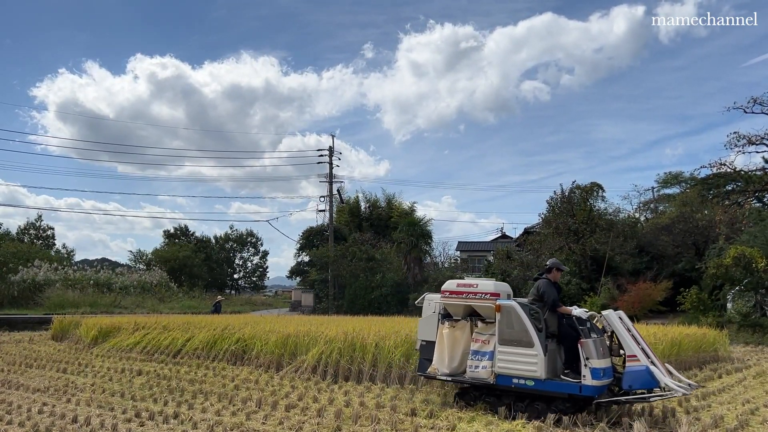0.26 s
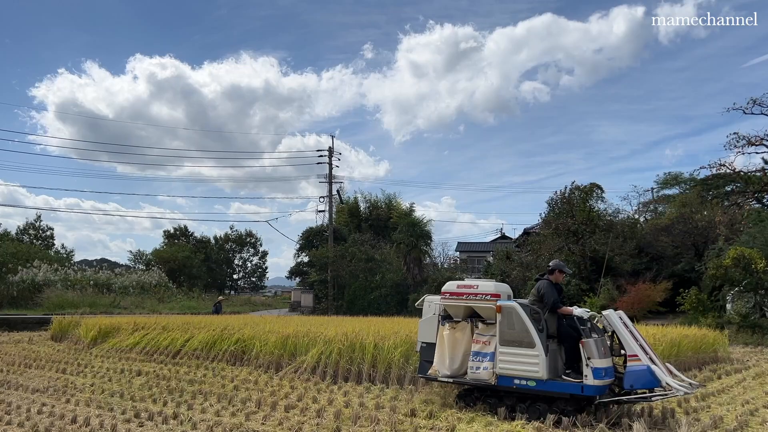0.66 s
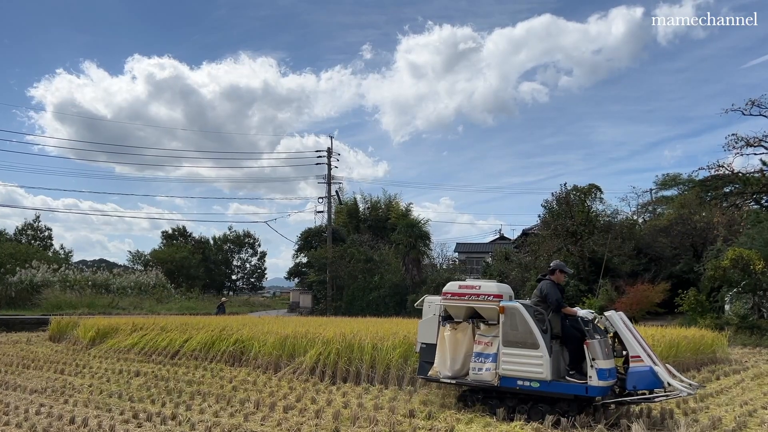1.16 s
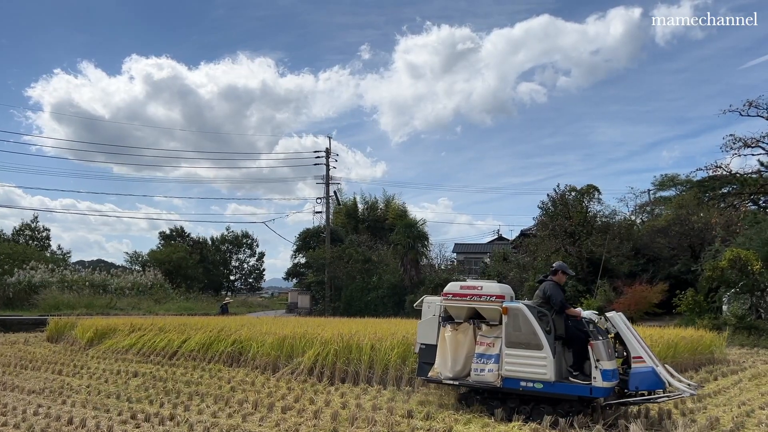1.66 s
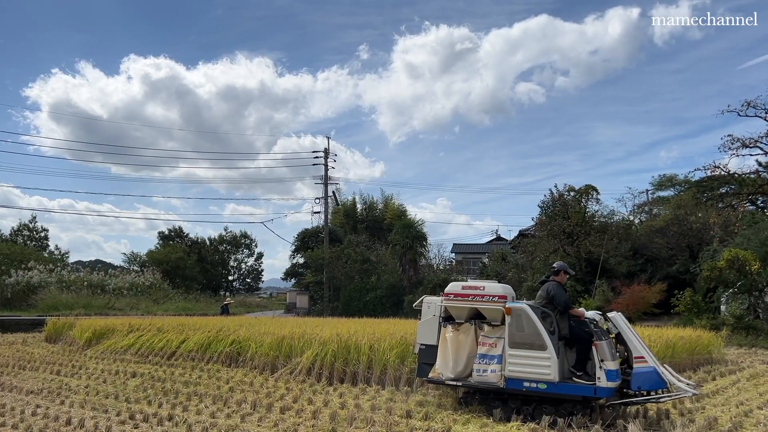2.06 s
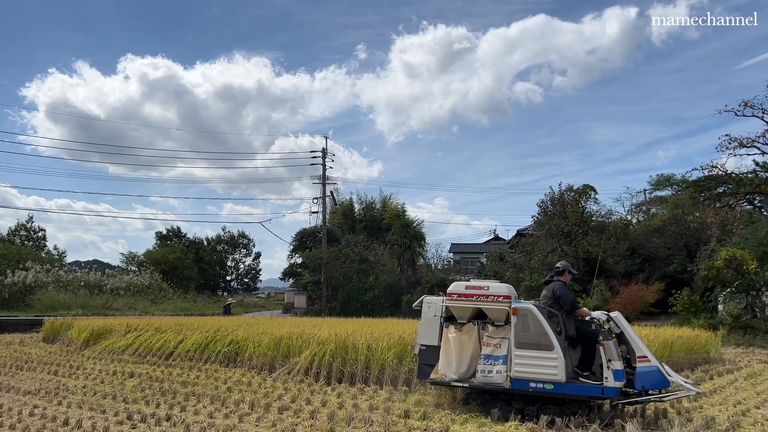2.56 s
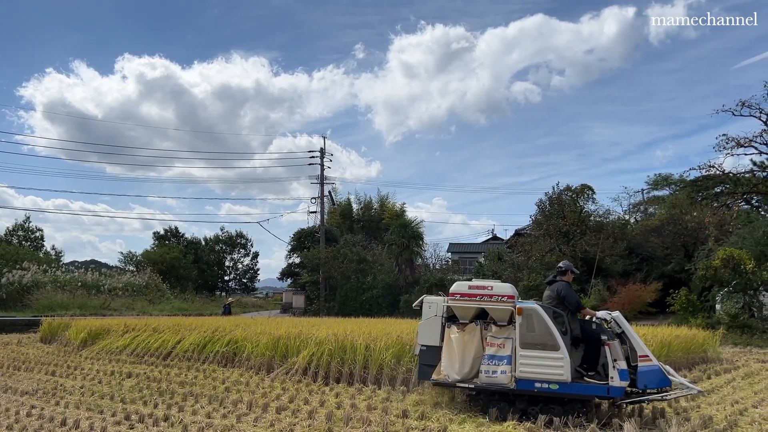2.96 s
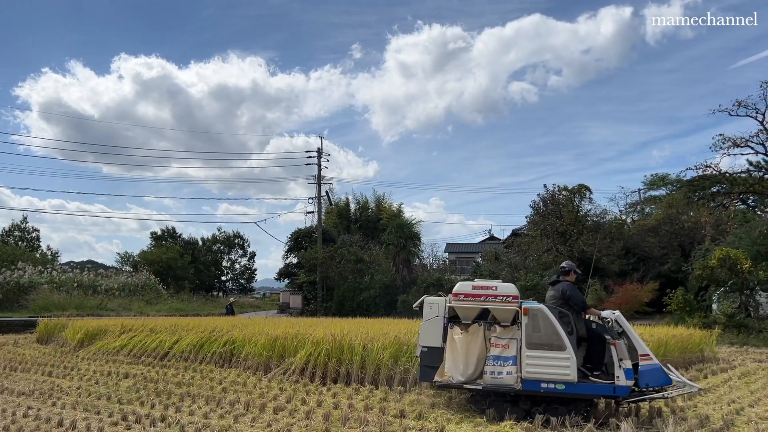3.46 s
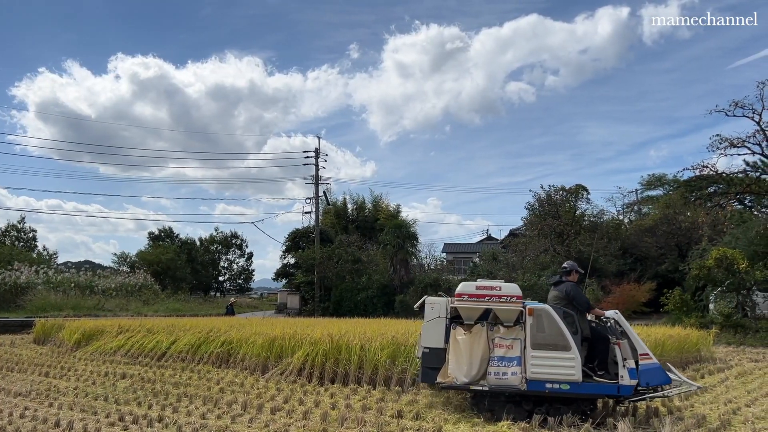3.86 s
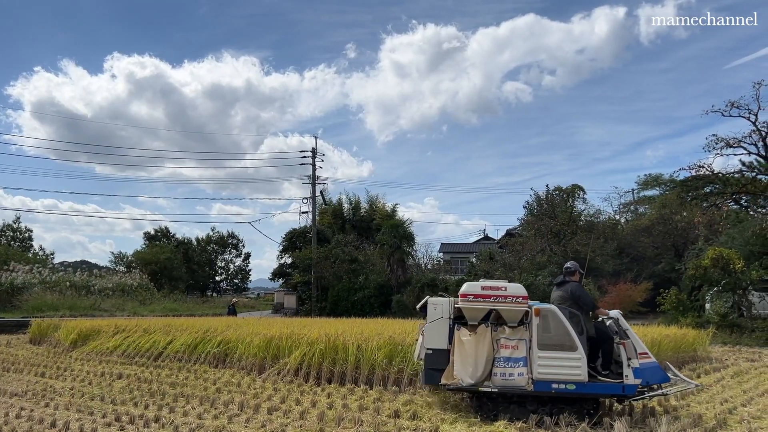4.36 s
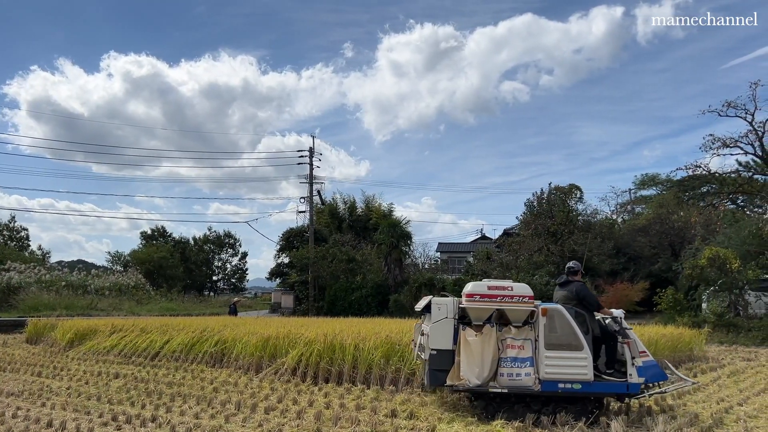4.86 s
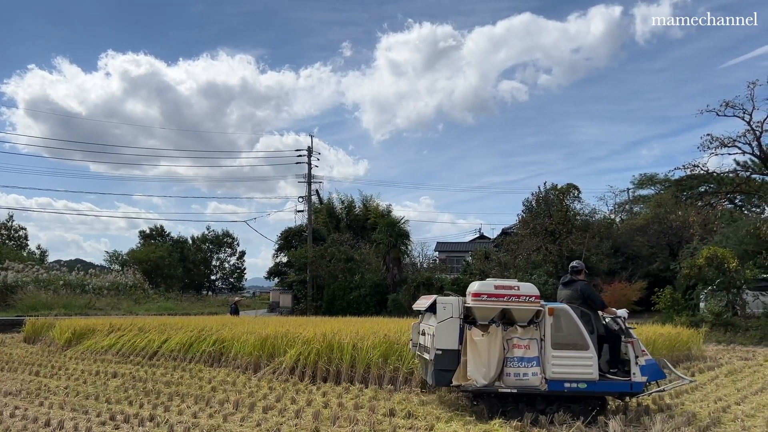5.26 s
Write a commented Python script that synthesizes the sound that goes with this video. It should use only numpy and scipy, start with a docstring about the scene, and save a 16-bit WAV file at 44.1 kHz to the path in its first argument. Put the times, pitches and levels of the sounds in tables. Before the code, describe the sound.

Deep wind thumps and gusts rumble over the steady roar, hum and thin whine of a little harvester cutting dry rice outdoors.

```python
"""A small rice combine drones in a breezy field, heard at two microphone ports, left and right.
Noise coloured by panel resonances makes the thresher's roar, and noise in fine grains the straw's rustle;
short bursts tick once an engine cycle, and wavering sines make the hum and whine of the machine.
Gusts buffet the ports as low noise; short swings add low swells of the throb and higher, wind-like thumps."""
import sys
import numpy as np
from scipy import signal
from scipy.fft import rfft, irfft, next_fast_len
from scipy.io import wavfile
from scipy.ndimage import uniform_filter1d, map_coordinates

SR = 44100
rng = np.random.default_rng(int(sys.argv[2]) if len(sys.argv) > 2 else 0)


def dump(signal):
    """Clip the signal to [-1, 1] and save it as 16-bit WAV at the path in sys.argv[1]."""
    limited = np.clip(np.atleast_2d(signal).T, -1, 1)
    pcm = np.round(limited * 32767).astype(np.int16)
    wavfile.write(sys.argv[1], SR, pcm)


N = 243431

# Panel resonances as heard at the ports:
# centre_hz, relative_gain_db, left_minus_right_db, likeness (correlation of the ports), left_lead_rad
PANEL_COLOUR = [(517, -1.2, -1, 0.67, 0.44), (810, 0, -6, 0.91, -0.11), (920, -2.5, -1, 1, 0.23),
                (1390, -6, 0, 0.64, -0.45), (1473, -2.5, -6, 0.98, -0.74), (1830, -2, -0.5, 0.91, 0.31),
                (2090, -5.5, -1.5, 0.64, 0.23), (2224, -4, -6, 0.94, 0.44), (2960, -10.5, 4, 0.58, 0.36),
                (3400, -15, -9, 0.44, -0.51), (3555, -12, 10.5, 0.7, -0.71), (3720, -20.5, 8.5, 0.58, 0.64),
                (4166, -11.5, -3, 0.97, -0.71), (4950, -21.5, -4.5, 0.36, 0.73)]


def thresher_roar():
    """Forced resonance: broadband noise drives the panels, which favour their own frequencies."""
    covers = rattle(count=1600, low_hz=1000.3, high_hz=3007, t60=0.11, spread_db=3.5)[[0, 0]]
    drive = unit(patchy(depth_db=0.85)) + .5 * unit(grainy(rate=400, spread_db=2.5))
    drive = drive + amp(-16.5) * covers  # loose covers ring under the roar
    return amp(-37) * unit(at_ports(through_modes(drive), PANEL_COLOUR))  # a steady level


def through_modes(pair):
    """Modal resonance: the sheet metal lifts narrow bands out of the roar."""
    # modes of the sheet metal: centre_hz, width_hz, boost_db
    modes = [(544, 12, 5.5), (591, 6.6, 5), (840, 36, 0.5), (900, 124, 3), (985, 17, 3.5), (1700, 44, 0),
             (1940, 90, 1.5), (2210, 44, 0.5), (2744, 21, 1.5)]
    m = next_fast_len(N + 8192)
    f = np.fft.rfftfreq(m, 1 / SR)
    boost_db = sum(db / (1 + (2 * (f - hz) / width) ** 2) for hz, width, db in modes)
    return irfft(rfft(pair, m) * amp(boost_db), m)[:, :N]


def rattle(count, low_hz, high_hz, t60, spread_db):
    """Free damped vibration: chains, fingers and covers are small pieces, each ringing at its own pitch."""
    draw = rng.random((count, 4))
    t = np.arange(int(.05 * SR)) / SR  # each ring is cut off after 50 ms
    hz = low_hz + (high_hz - low_hz) * draw[:, [1]]
    size_db = spread_db * draw[:, [2]]
    envelope = amp(size_db - 60 * t / t60) * (1 - np.exp(-t / 0.0027))
    rings = envelope * np.sin(2 * np.pi * hz * t)
    # both channels lie end to end on one line; each piece falls in either half
    channel_length = N + len(t)
    start = (draw[:, [0]] * N).astype(int) + (draw[:, [3]] < .5) * channel_length
    both = np.bincount((start + np.arange(len(t))).ravel(), rings.ravel(), 2 * channel_length)
    return unit(both.reshape(2, -1)[:, :N])


def straw_and_ticks():
    """Granular noise with interchannel phase: straw and thin ticks differ left to right by band."""
    # feed of straw: time_s, relative_level_db
    feed = [(0.0, -49), (0.52, -49.5), (0.68, -47.5), (1.1, -49), (1.69, -48.5), (1.95, -48), (2.35, -49),
            (2.78, -48), (3.89, -49.5), (4.07, -45.5), (4.4, -49), (4.55, -46.5), (5.05, -47.5), (5.3, -47),
            (5.52, -46.5)]
    # colour at the ports, which are opposed near 9 to 11 kHz:
    # centre_hz, relative_gain_db, left_minus_right_db, likeness, left_lead_rad
    straw_colour = [(5000, -15.7, -1.5, .54, 1.4), (5350, -17.5, -1.2, .35, 1.5),
                    (5480, -21.5, -.9, .1, 2.2), (5780, -19.8, 0, .3, 2.4), (6050, -18.3, .5, .23, -.8),
                    (6300, -18.8, 3, .4, -.3), (6750, -18.3, 5.5, .45, -.2), (6900, -19.5, 5, .5, -.3),
                    (7800, -18.6, 4, .67, -.9), (8600, -19.2, 2.6, .67, -1.8), (9150, -22, 0, 1, -np.pi),
                    (10100, -23.6, 0, 1, -np.pi), (10900, -20.5, 0, 1, -np.pi), (11250, -17.6, 0, .3, -4.6),
                    (11600, -15, 0, .8, -6.1), (12400, -17, 0, 1, -2 * np.pi),
                    (14800, -21.5, 0, 1, -2 * np.pi), (15200, -22, 0, .8, -2 * np.pi),
                    (15700, -24, 0, .55, -2 * np.pi)]
    feed_db, = curves(feed)
    clumps = wobble(21.99)
    quick = clumps - uniform_filter1d(clumps, size=SR // 5)
    straw = unit(grainy(rate=850, spread_db=2.0)) + 0.98 * unit(patchy(depth_db=1.5))
    chains = .3 * rattle(count=1500, low_hz=4900, high_hz=11000, t60=.07, spread_db=5)
    rustle = amp(feed_db + .35 * quick) * (straw + chains)  # clumps pass unevenly
    return amp(20.0) * at_ports(rustle + amp(2.8) * ticks(dull=False), straw_colour)


def knocks():
    """Transmission through panels: duller ticks take on the resonances of the covers."""
    return amp(6.0) * at_ports(ticks(dull=True), PANEL_COLOUR)


def ticks(dull):
    """Impulsive excitation: each blow is a short noise burst; differencing thins it unless dull."""
    # single ticks placed by time, many of them loud: time_s, relative_strength_db
    single_ticks = [(0.2643, -47), (0.3511, -49), (0.6754, -46), (1.0374, -48), (1.2371, -45),
                    (1.4304, -48), (1.8764, -47), (2.1685, -44), (2.5182, -49), (2.6289, -47),
                    (2.8205, -41), (2.9078, -44), (2.9946, -46), (3.3408, -43), (3.689, -47), (3.7763, -50),
                    (3.9499, -43), (4.0796, -42), (4.1235, -43), (4.2084, -45), (4.5574, -44),
                    (4.6334, -44), (4.8165, -47), (4.9023, -48), (5.0779, -46), (5.2354, -46)]
    turns, tick_db = engine_turns()
    at = np.flatnonzero(np.diff(np.floor(turns)))
    blows = np.zeros(N)
    blows[at] = amp(tick_db[at] + rng.uniform(-6, 2, len(at)))
    for s, db in single_ticks:
        blows[round(s * SR)] = amp(db)
    t = np.arange(SR // 25) / SR
    onset = (1 - np.exp(-t / .0015)) ** 2
    decay = amp(-60 * t / .028) + .15 * amp(-60 * t / .09)  # a quick decay and a weak slower one
    burst = rng.standard_normal((2, N)) * signal.fftconvolve(blows, onset * decay)[:N]
    return burst if dull else np.diff(burst, prepend=0)


def engine_turns():
    """Periodic timing: cycles passed since the start, with uneven lateness, and the strength of the tick."""
    # engine cycle: time_s, lateness_ms, relative_tick_db
    cycle = [(0, 8.5, -45), (.5, 1.5, -54), (.9, -0.5, -46.5), (1.8, -4.5, -51), (2.2, 6, -48),
             (2.6, 4, -47), (3.3, 2, -52), (4, 1.5, -47.5), (4.9, 4, -43), (5.52, 3.5, -42)]
    cycle_hz = 23.05
    late_ms, tick_db = curves(cycle)
    return cycle_hz * (np.arange(N) / SR - late_ms / 1000), tick_db


def hum():
    """Superposition: the machine's tones add alike at both ports, the metal rings unequally."""
    # low machine tones, and thin wavering strands within the whirr: pitch_hz, rms_db, pitch_waver_hz
    machine_tones = [(134, -44, .6), (227.5, -47, .8), (269.5, -53, .6), (341, -54, 2), (386, -57, 1),
                     (406, -56, 1.5), (1157, -57.5, 1.2), (1828, -64, 1.5), (1425, -64, 3), (1540, -63, 5),
                     (1650, -65, 5), (1682, -65, 4), (1712, -65, 5), (1790, -63, 5), (1846, -62, 1.5),
                     (1893, -63, 5), (1965, -63, 8), (2003, -65, 4), (2032, -65.5, 3), (2226, -66, 4),
                     (2272, -67, 4), (2763, -65, 4)]
    tones = wavering(machine_tones, waver_db=1.5, rate=7.7) + engine_orders() + load_tones()
    tones = tones + gear_whine() + squeals()
    return np.sqrt(2) * (tones + metal_rings() * amp([[2.5], [-6]]))  # root 2 turns rms into peak


def engine_orders():
    """Harmonic excitation: a cover rings with whole multiples of the engine cycle."""
    # engine orders: multiple, rms_db
    orders = [(29, -61), (30, -59), (31, -63)]
    turns = engine_turns()[0]
    return sum(amp(db + 3.1 * wobble(1.4)) * np.sin(2 * np.pi * (k * turns + rng.random()))
               for k, db in orders)


def load_tones():
    """Succession of partials: one tone fades out, then another sets in and stays."""
    since = np.arange(N) / SR - 2.9  # seconds from the changeover
    loaded = amp(-45 + wobble(4)) * np.sin(2 * np.pi * 269.7 * since + wobble(2))
    unloaded = wavering([(386, -49.5, 2)], waver_db=2.5, rate=8)  # Hz, dB rms, Hz
    return np.clip(since / .2, 0, 1) * loaded + np.clip(-since / .4, 0, 1) * unloaded


def gear_whine():
    """Frequency modulation: a gear whine wanders slowly and wavers quickly in pitch and level."""
    # gear whine: time_s, pitch_hz, rms_db
    whine = [(0, 1955, -55), (.45, 1965, -55.5), (.9, 1938, -53), (1.3, 1928, -57), (2, 1925, -55),
             (2.7, 1930, -54), (3.3, 1938, -58), (4.3, 1936, -58), (5, 1931, -53), (5.52, 1935, -58)]
    flutter_db, waver_hz = 3, 10
    whine_hz, whine_db = curves(whine)
    turns = np.cumsum(whine_hz + waver_hz * wobble(45)) / SR
    return amp(whine_db + flutter_db * wobble(12)) * np.sin(2 * np.pi * turns)


def squeals():
    """Amplitude envelope: faint, nearly steady tones swell and fade over half a sine."""
    # squeals: start_s, pitch_hz, rms_db (at the crest), length_s
    tones = [(.22, 1402, -53, .6), (2.35, 1828, -56.5, .9)]
    t = np.arange(N) / SR
    return sum(amp(db) * arch(t, s, length) * np.sin(2 * np.pi * hz * t + wobble(11))
               for s, hz, db, length in tones)


def metal_rings():
    """Phase modulation: a quick random phase roughens short rings of metal."""
    # rings: start_s, pitch_hz, relative_level_db, length_s
    short_rings = [(2.703, 4760, -48, .024), (2.703, 4120, -54, .034), (2.703, 5000, -54, .026),
                   (2.722, 4900, -52, .02), (2.736, 4780, -51, .014), (2.66, 4250, -52, .014),
                   (4.657, 3390, -45.5, .012), (4.667, 3370, -50, .011)]
    t = np.arange(N) / SR
    rough = .6 * wobble(200)  # radians
    return sum(amp(db) * arch(t, s, length) * np.sin(2 * np.pi * hz * t + rough)
               for s, hz, db, length in short_rings)


def throb():
    """Beating: two low shaft tones of neighbouring pitch; also gives the turns of the lower."""
    # lowest shaft tone, which swells and sinks: time_s, level_db (rms)
    swell = [(0, -22.5), (.2, -31), (.7, -38), (.95, -32), (1.03, -37), (1.12, -30), (1.27, -34),
             (1.45, -32), (1.85, -34), (2.1, -26), (2.4, -38.5), (2.6, -31.5), (2.95, -36.5), (3.35, -27),
             (3.8, -31), (4, -33), (4.2, -31), (4.37, -42), (4.55, -26.5), (5.1, -26.5), (5.52, -32)]
    throb_hz, drift_hz = 66.9, .35
    throb_db, = curves(swell)
    turns = np.cumsum(throb_hz + drift_hz * wobble(2.98)) / SR + rng.random()
    low = amp(throb_db + 1.2 * wobble(10)) * np.cos(2 * np.pi * turns)
    second = wavering([(86.2, -36, .6)], waver_db=2, rate=5.5)  # Hz, dB rms, Hz
    return np.sqrt(2) * (low + second), turns  # root 2 turns rms into peak


def thumps(throb_turns):
    """Steepened wave packets: low swells of the throb and higher, wind-like thumps; also the dip under each."""
    # low swells and thumps: centre_s, level_db, pitch_hz
    packets = [(0.029, -16.5, 75), (0.09, -19, 81.5), (0.169, -17.5, 83), (0.2, -15.5, 90),
               (0.294, -14.5, 76.5), (0.364, -17, 80), (0.47, -23, 79), (0.518, -12.5, 77),
               (0.587, -12, 119), (0.6, -18, 69.5), (0.612, -22, 200), (0.634, -18.5, 75),
               (0.645, -19.5, 240), (0.665, -18, 284), (0.697, -13, 74), (0.724, -12.5, 230),
               (0.731, -20, 111), (0.742, -19, 260), (0.767, -11.5, 122), (0.799, -18.5, 250),
               (0.83, -17, 166), (0.846, -16, 81), (0.895, -21, 91), (1.075, -25.5, 230), (1.089, -22, 332),
               (1.092, -16.5, 80), (1.115, -23, 262), (1.301, -18, 76), (1.366, -19, 88),
               (1.408, -19, 76.6), (1.447, -19.5, 78.5), (1.551, -16.5, 67.5), (1.764, -18.5, 81.4),
               (1.824, -15.5, 86), (1.96, -20.5, 82), (2.012, -20.5, 76), (2.057, -18.5, 80),
               (2.119, -17, 222), (2.173, -21, 227), (2.185, -16.5, 74), (2.217, -13, 79),
               (2.236, -12.5, 208), (2.24, -14.5, 94), (2.304, -22.5, 276), (2.445, -21, 232),
               (2.532, -22, 70), (2.63, -20.5, 78), (2.736, -19, 78), (2.891, -19.5, 80), (3.035, -23, 78),
               (3.042, -21.5, 242), (3.079, -20, 200), (3.154, -21, 229), (3.234, -18.5, 78),
               (3.285, -17.5, 74), (3.371, -13.5, 82), (3.384, -19.5, 198), (3.472, -20, 74),
               (3.52, -17.5, 200), (3.536, -15, 81), (3.727, -16.5, 66.7), (3.793, -19.5, 95),
               (3.82, -17, 115), (3.822, -24, 247), (3.838, -15, 282), (3.845, -15.5, 80),
               (3.868, -14, 89.5), (3.892, -14, 70.4), (3.921, -15, 140), (3.941, -13.5, 84),
               (3.952, -20, 241), (3.965, -15.5, 115), (3.973, -17, 274), (3.987, -17.5, 293),
               (4.011, -16, 125), (4.039, -14.5, 79), (4.087, -15, 81.6), (4.112, -25, 200),
               (4.153, -13.5, 70.5), (4.206, -15.5, 68), (4.359, -16, 80), (4.397, -15.5, 137),
               (4.448, -20, 258), (4.478, -16, 66), (4.524, -16.5, 70.5), (4.559, -15.5, 74),
               (4.63, -20, 240), (4.672, -17, 282), (4.678, -11.5, 94), (4.7, -15, 60), (4.718, -18, 281),
               (4.738, -17.5, 218), (4.748, -13, 80), (4.882, -16.5, 79.4), (4.945, -21, 70),
               (5.034, -23, 276), (5.109, -18.5, 75), (5.145, -18.5, 82), (5.201, -18.5, 71),
               (5.26, -17, 87), (5.308, -16.5, 86.5), (5.342, -17.5, 70), (5.4, -18, 75),
               (5.424, -16, 72.5), (5.465, -18, 81)]
    swell_top_hz = 112  # swells below this follow the throb's phase
    steep_2nd, steep_3rd = 0.23, 0.093  # overtones that steepen the falling flank
    edge_hz, edge_db = 430, -16.5  # the sharp edge at the centre, its level relative to the swing
    give_way, give_width = .85, 1.1  # depth of the dip; its width, in periods of the thump
    t = np.arange(SR // 7) / SR - 1 / 14  # seconds from the centre
    swings, passes = np.zeros((2, N + SR)), np.ones(N + SR)
    for (s, db, hz), (phase, edge_phase) in zip(packets, rng.random((len(packets), 2))):
        first = round(s * SR - len(t) / 2)
        span = slice(max(first, 0), max(first + len(t), 0))
        cut = len(t) - (span.stop - span.start)  # samples that fall before the start
        if hz < swell_top_hz:
            phase = throb_turns[round(s * SR)]
        angle = 2 * np.pi * (hz * t + phase + [[.035], [-.035]])  # left leads right
        overtones = steep_2nd * np.sin(2 * angle) - steep_3rd * np.cos(3 * angle)
        wave = np.cos(angle) + (hz < 2 * swell_top_hz) * overtones
        narrowing_hz = hz + 0.43 * max(hz - swell_top_hz, 0)  # higher thumps make fewer swings
        swing = amp(db) * np.exp(-(t * narrowing_hz / 0.74) ** 2) * wave
        edge = np.exp(-(t * edge_hz / 0.42) ** 2) * np.cos(2 * np.pi * (edge_hz * t + edge_phase))
        swings[:, span] += (swing + amp(db + edge_db) * edge)[:, cut:]
        passes[span] *= 1 - give_way * np.exp(-(t[cut:] * hz / give_width) ** 2)
    return swings[:, :N], passes[:N]


def chassis_rumble():
    """Structure-borne sound: patchy low noise stands for the chassis and tracks."""
    # rumble at the ports: centre_hz, relative_gain_db, left_minus_right_db, likeness, left_lead_rad
    rumble_colour = [(40, -38, 0, .95, 0), (67.5, -0.5, 0, 0.82, 0.0041), (147, -1.5, 0.01, 0.4, 0),
                     (260, -19.5, 0, 0.35, 0.013), (378, -8, 0.017, 0.98, 0.017), (464, -13.5, 0, 0.97, 0)]
    return amp(-39.0) * unit(at_ports(patchy(depth_db=2), rumble_colour))


def wind():
    """Turbulent pressure: gusts push the ports slowly and flutter in lumps."""
    # gusts: time_s, buffet_db, flutter_db
    gusts = [(0, -23, -30), (.52, -27.5, -31.5), (.66, -22, -30), (.84, -25.5, -34.5), (1.03, -45, -37),
             (1.09, -43, -31), (1.17, -42, -41), (1.45, -33, -34), (1.87, -28.5, -32), (2.01, -28, -32),
             (2.22, -29, -29), (2.26, -40, -35.5), (2.78, -39, -40.5), (3.08, -31, -31.5), (3.4, -28, -35),
             (3.78, -28.5, -34.5), (3.86, -25, -28), (3.98, -22, -26), (4.06, -22.5, -32), (4.58, -25, -32),
             (4.72, -20, -28), (4.82, -29.5, -36.5), (5.05, -28, -35.5), (5.52, -31, -36)]
    # slow push: centre_hz, relative_gain_db, left_minus_right_db, likeness, left_lead_rad
    buffet_colour = [(28, -34, 0.0024, .9, 0.014), (41, -7, 0.01, 0.9, 0.0049), (61, 1, 0, 0.99, 0.013),
                     (103, -8.5, 0.0094, 0.74, 0.0076), (137, -9, 0.0053, 0.75, 0.0087),
                     (186, -32, 0.0029, 0.6, 0)]
    # flutter: centre_hz, relative_gain_db, left_minus_right_db, likeness, left_lead_rad
    flutter_colour = [(89.5, -10, 0, 0.56, 0), (139, -3.5, 0.012, 1, 0.0062), (255, -6, 0.006, 0.7, 0),
                      (373, -13, 0.0047, 0.75, 0.013), (495, -21, 0, 0.77, 0.0076)]
    buffet_db, flutter_db = curves(gusts)
    push = evened(at_ports(rng.standard_normal((2, N)), buffet_colour), .04)
    swells = amp(1.5 * wobble(16))  # random swells within a gust
    buffet = amp(buffet_db) * unit(swells * push)
    lumps = amp(3.2 * wobble(40) + 0.69 * wobble(13))
    quick = evened(at_ports(rng.standard_normal((2, N)), flutter_colour), 0.02)
    return buffet, amp(flutter_db) * unit(lumps * quick)


def amp(db):
    """Decibel law: the amplitude ratio for a level."""
    return 10 ** (np.asarray(db) / 20)


def unit(x):
    """Normalisation to a root mean square of one."""
    return x / np.sqrt(np.mean(x ** 2) + 1e-20)


def curves(rows):
    """Linear interpolation: one value per sample for each column after the time."""
    s, *cols = np.transpose(rows)
    return [np.interp(np.arange(N) / SR, s, c) for c in cols]


def wobble(rate):
    """Band-limited randomness: a smooth curve through random knots, rate of them a second."""
    knots = rng.standard_normal(int(N * rate / SR) + 4)
    return map_coordinates(knots, [np.arange(N) * rate / SR])


def arch(t, s, length):
    """Half-sine envelope from s on."""
    return np.sin(np.pi * np.clip((t - s) / length, 0, 1))


def wavering(table, waver_db, rate):
    """Random modulation: sines that waver in pitch and level."""
    tones = 0
    for hz, db, waver_hz in table:
        level = amp(db + waver_db * wobble(rate))
        turns = np.cumsum(hz + waver_hz * wobble(3)) / SR + rng.random()
        tones = tones + level * np.sin(2 * np.pi * turns)
    return tones


def patchy(depth_db):
    """Time-frequency modulation: two noises share patches of random gain."""
    z = signal.stft(rng.standard_normal((2, N)), nperseg=512)[2]
    field = uniform_filter1d(rng.standard_normal(z.shape[1:]), size=6, axis=0)
    field = uniform_filter1d(field, size=8, axis=1)
    return signal.istft(z * amp(depth_db * unit(field)), nperseg=512)[1][:, :N]


def grainy(rate, spread_db):
    """Granular modulation: two noises are shaped by the same grains of unlike sizes, rate a second."""
    size = amp(spread_db * np.minimum(rng.exponential(size=int(N * rate / SR) + 2), 4))
    return rng.standard_normal((2, N)) * np.interp(np.arange(N) * rate / SR, np.arange(len(size)), size)


def evened(pair, seconds):
    """Level compression: smooths part of the noise's own swells, so that the gusts set its level."""
    power = uniform_filter1d(np.mean(pair ** 2, axis=0), int(seconds * SR))
    return unit(pair / (np.abs(power) + .1 * power.mean()) ** .35)


def at_ports(pair, table):
    """Spatial coherence: the ports share the first signal and hear the second opposed, then step apart."""
    m = next_fast_len(N + 8192)
    hz, *cols = np.transpose(table)
    grid = np.log(np.fft.rfftfreq(m, 1 / SR) + 1)
    db, tilt_db, alike, lead = [np.interp(grid, np.log(hz), c) for c in cols]
    # steep slopes beyond both ends of the table
    db -= 90 * np.maximum(np.log(hz[0]) - grid, 0) + 300 * np.maximum(grid - np.log(hz[-1]), 0)
    turn = np.arccos(np.clip(alike, 0, 1)) / 2  # mixing angle that gives the likeness
    same, opposed = rfft(pair, m) * amp(db) * [np.cos(turn), np.sin(turn)]
    step = amp(tilt_db / 2) * np.exp(.5j * lead)
    return irfft([(same + opposed) * step, (same - opposed) / step], m)[:, :N]


def scene():
    """Superposition: all sources add; throb, buffet and flutter dip under each thump."""
    buffet, flutter = wind()
    shaft, turns = throb()
    swings, passes = thumps(turns)
    machine = thresher_roar() + straw_and_ticks() + knocks() + hum() + chassis_rumble()
    return machine + np.sqrt(passes) * (flutter + shaft) + passes * buffet + swings


def record(dry):
    """Band limiting: the microphone rolls off the deepest bass and passes nothing above its top."""
    low_cut_hz, top_hz = 30, 15780
    m = next_fast_len(N + 8192)
    hz = np.fft.rfftfreq(m, 1 / SR)
    rise = 1j * hz / low_cut_hz
    bass_cut = (rise ** 2 / (1 + np.sqrt(2) * rise + rise ** 2)) ** 2  # two second-order stages
    return irfft(rfft(dry, m) * bass_cut * (hz < top_hz), m)[:, :N]


dry = scene()
out = record(dry)
dump(out)
```